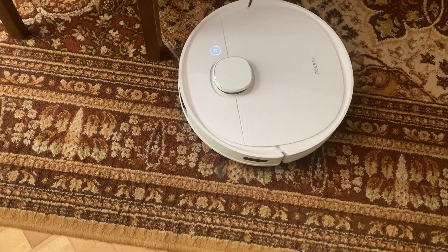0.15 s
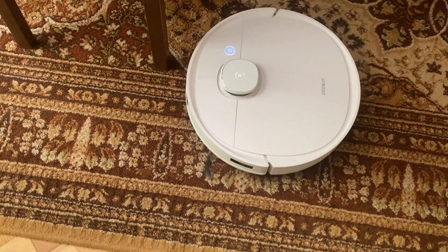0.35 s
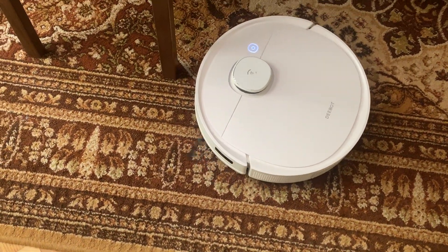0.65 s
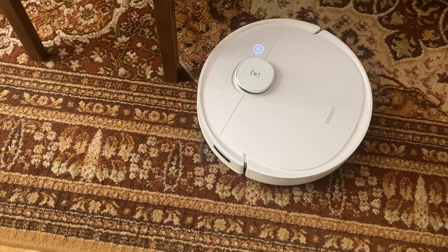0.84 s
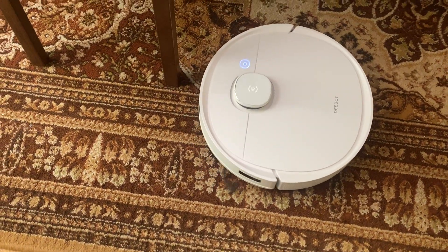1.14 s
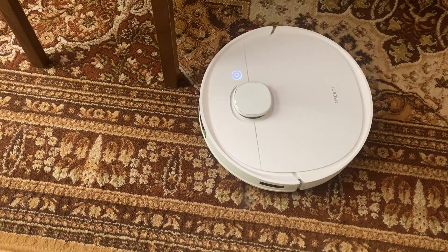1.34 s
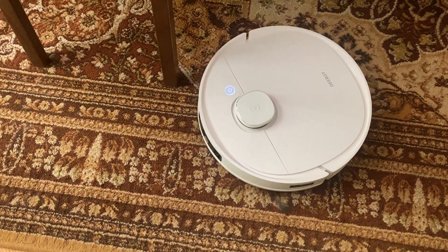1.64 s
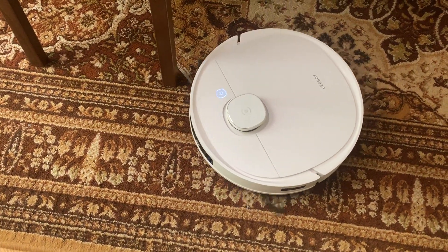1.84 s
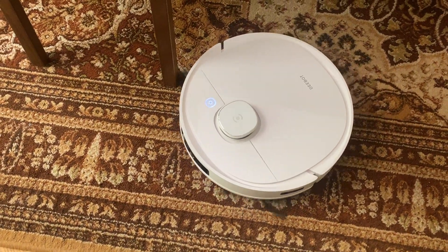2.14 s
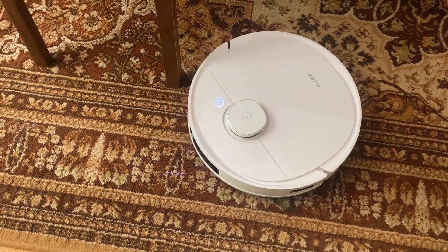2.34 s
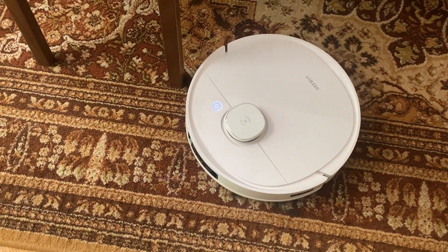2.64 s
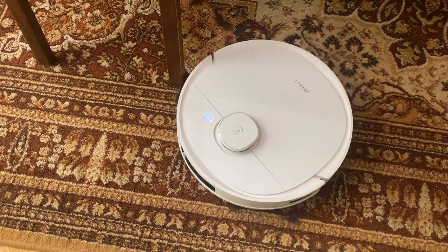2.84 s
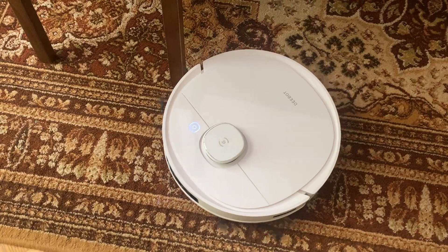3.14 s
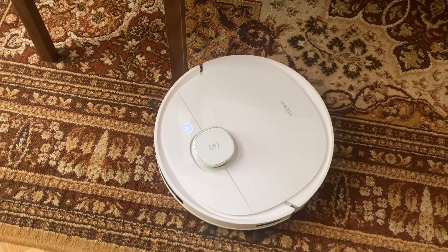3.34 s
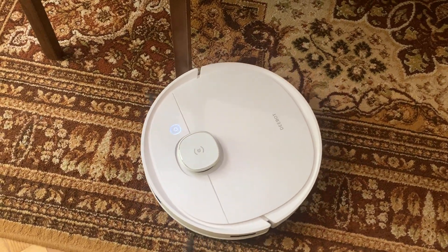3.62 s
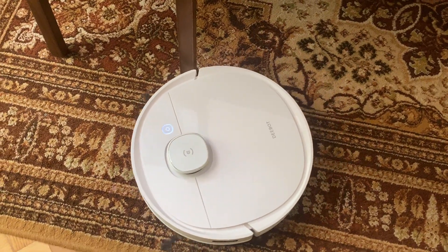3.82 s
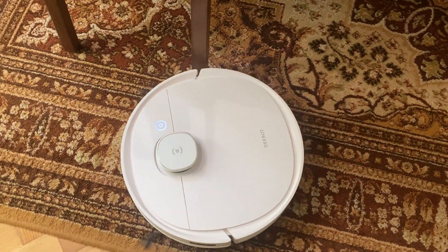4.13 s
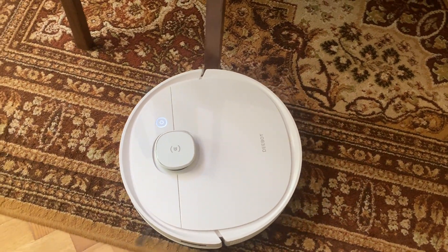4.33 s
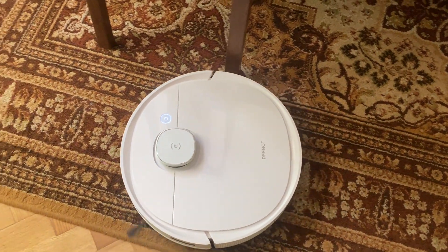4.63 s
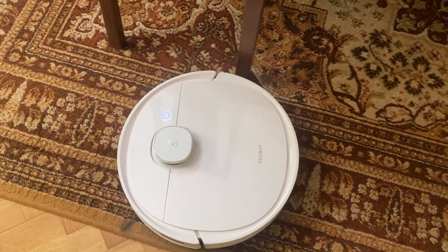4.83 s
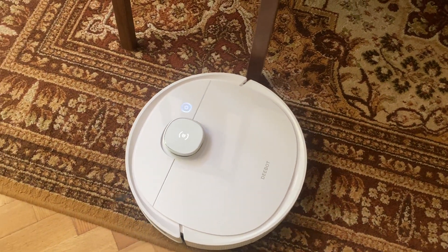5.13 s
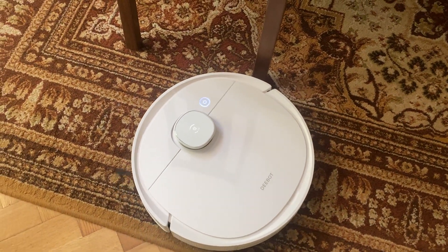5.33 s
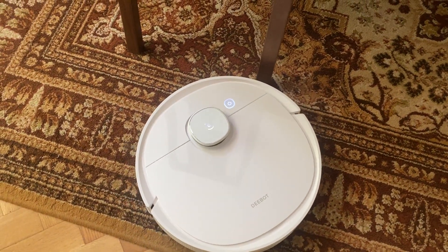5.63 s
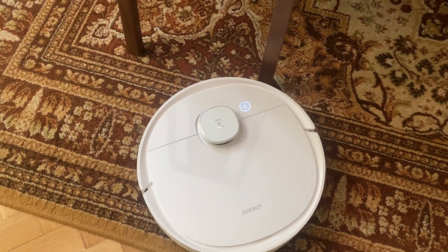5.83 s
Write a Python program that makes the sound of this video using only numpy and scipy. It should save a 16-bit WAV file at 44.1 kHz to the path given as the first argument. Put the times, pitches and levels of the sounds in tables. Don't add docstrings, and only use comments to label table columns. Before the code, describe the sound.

A robot vacuum hums and rushes steadily on a rug indoors, with a wavering high whine, soft thumps and brief squeaks.

```python
import sys
import numpy as np
from scipy import signal
from scipy.io import wavfile
from scipy.ndimage import uniform_filter1d

SR = 44100
rng = np.random.default_rng(int(sys.argv[2]) if len(sys.argv) > 2 else 0)


def digitize_waveform(pressure):
    field = np.atleast_2d(pressure).T
    bounded = np.clip(field, -1, 1)
    quanta = np.round(bounded * 32767).astype(np.int16)
    wavfile.write(sys.argv[1], SR, quanta)


def voltage_ratio(level):
    return 10 ** (np.asarray(level, float) / 20)


N = 263277
T = np.arange(N) / SR

# t/s, blade passing f/Hz, shaft hum level/dB, second order level/dB
FAN = [(0, 3288, -41, -40.5), (.3, 3257, -48, -40), (.66, 3258, -52, -42), (.95, 3250, -36.5, -41.5),
       (1.65, 3247, -38.5, -40.5), (1.85, 3240, -41, -42.5), (2.3, 3240, -38.5, -47),
       (2.4, 3241, -40.5, -43), (2.65, 3237, -36.5, -48), (2.95, 3242, -38, -45),
       (3.35, 3252, -37.5, -37.5), (3.95, 3260, -39.5, -42), (4.55, 3252, -34.5, -44),
       (4.8, 3232, -31, -44.5), (5.2, 3237, -36.5, -45), (5.55, 3248, -37.5, -47), (5.72, 3236, -34, -48),
       (5.97, 3265, -31, -45)]
# multiple of shaft speed, level/dB
FAN_UPPER = [(3, -61), (4, -65), (8, -68), (10, -68), (24, -68), (36, -80)]
# t/s, half length/s,
# level/dB
HUM_FALTERS = [(2.37, 0.029, -11), (2.8, 0.037, -1), (3.3, 0.011, -7), (4.575, 0.015, -10),
               (4.7, 0.033, -8), (1.22, 0.16, -4.5), (0.054, 0.035, -9), (.35, 0.029, -6), (.52, .05, -7),
               (3.4, 0.0369, -3), (4.2, .03, 0.5), (.78, 0.077, 5), (4.71, .04, 7), (4.2, .15, -3),
               (1.95, .12, 2), (2.68, .03, 4.5), (4.5, .02, -4), (4.7, 0.022, -5), (5.39, 0.019, -5),
               (2.7, .07, -5), (2.62, 0.03, -7), (2.19, .015, 4), (6.1, .02, -12), (5.63, .04, -9),
               (5.84, .04, -1.5)]
# middle t/s, half length/s, left level/dB, right level/dB, right lag/rad
WHINE_BEAMS = [(.72, .1, -65, -52, -2.5), (1.08, 0.12, -49, -51, -2.5), (1.695, 0.19, -45.5, -50, -1.5),
               (1.42, .15, -52, -53, -2.1), (2.14, 0.28, -45, -47.5, -1.5), (2.836, 0.29, -41.5, -48, -1.6),
               (3.07, 0.035, -60, -43, -1.5), (3.92, 0.13, -49.5, -58, -1.5), (4.12, 0.12, -55, -42, 3),
               (4.355, 0.096, -59, -53, 5), (4.55, 0.12, -44, -43, 5), (3.4, .2, -56, -57, -1.3),
               (4.68, .06, -51, -52, 5.5), (5.0, 0.12, -56, -49, 6.5), (5.3, 0.17, -54, -49.5, 3.5),
               (5.799, 0.27, -51, -48, 3)]
# multiple of roller speed, free level/dB, rise at full load/dB, rise under starting drag/dB
BRUSH_ORDERS = [(2, -70.5, 17, 2.5), (3, -53.5, 8, 3.5), (4, -49, 0.5, -1.7), (5, -57, 11, 10),
                (7, -61.5, 17, -4), (8, -56, 18, 4), (9, -60, 6, 3), (10, -54.5, 6.5, 3)]
# t/s, half length/s, level/dB
FOURTH_SWELLS = [(.27, 0.11, 7.5), (1.37, 0.19, 7), (2.343, 0.04, 10.5), (2.813, 0.037, 5), (3.447, .15, 5),
                 (5.9, 0.22, 4)]
# start t/s, grip time/s, let go t/s, sag/Hz, belt strain level/dB
BITES = [
    (.37, 0.17, 1.09, 1.18, -38.5),
    (.6, .13, 1.07, 1.99, -75),
    (2.24, .15, 2.54, 3.97, -47),
    (5.18, 0.282, 6.2, 2, -35),
    (5.55, 0.25, 6.2, 1.34, -48),
]
# t/s, half length/s, level/dB
BELT_SLIPS = [(0.68, 0.017, -10), (.9, .05, -9), (.53, 0.054, 1.5), (0.645, .03, 2.5), (.74, 0.033, 4),
              (0.813, .035, 2), (1.1, .05, -0.5), (5.347, .05, -3), (5.52, 0.039, 3), (5.9, .08, 0)]
# t/s, level/dB
GEAR = [(0, -50.5), (.5, -46.5), (1.1, -52), (1.25, -48), (1.7, -51), (1.9, -58), (2.3, -49.5), (3.3, -63),
        (3.9, -49), (4.6, -49.5), (4.9, -47), (5.3, -47), (5.45, -59), (5.97, -58)]
# f/Hz, level/dB per Hz
AIR_COLOUR = [(25, -62), (60, -25.5), (110, -12.5), (200, 0.5), (300, -1), (450, 3), (600, -1.5),
              (1100, -6), (1800, -10.5), (3150, -5.5), (3450, -15.5), (7000, -25), (12000, -31),
              (15300, -41.5)]
# f/Hz, width/Hz, level/dB
RESONANCES = [(169, 19, -7), (306, 49, -2.5), (366, 49, 4), (517, 52, 2.5), (651, 25, 4.5), (829, 144, 7),
              (981, 84, 3.5), (1188, 206, 4.5), (2424, 40, 6.5), (2790, 44, 6), (4270, 890, -0.5),
              (5630, 1940, 4.5), (7470, 340, 4.5),
              (12350, 900, 4), (14750, 900, 9), (15400, 300, -6)]
# f/Hz, left minus right level/dB, likeness/0-1, right lag/rad
PORTS = [(50.3, -3, 0.3, 1.2), (89, -3.5, 0.03, 0.84), (203, 9.5, 1, 1), (288, 14.5, 1, 0.21),
         (412, 8, 0.5, 1.52), (554, 3.5, 0.91, 2.98), (1090, 0.6, 0.99, 4.22), (2100, 2, 0, 3.88),
         (2560, 1, 0.78, 4.21), (3036, 3.5, 0.46, 2.9), (4220, -3.5, 0, 9.1), (4820, -1.5, 0.52, 2.8),
         (6300, 0, 0.36, 1.75), (7690, -1, 0.98, 2.79), (11100, -0.5, 0.98, 2.9)]
# t/s, length/s, f/Hz, width/Hz, level/dB
AIR_SWELLS = [(0.48, 0.32, 1280, 240, 6.5), (1.9, 1.2, 2100, 24.9, 8.5), (1.75, 0.14, 2400, 100, -3),
              (2.8, 0.25, 1300, 30.2, -6), (5.52, 0.35, 2900, 30, 15), (4.74, 1.2, 4190, 130, 7),
              (5.55, 0.17, 5420, 220, 11), (2.03, 1.1, 6000, 120, 8.5), (5.3, 1.49, 1280, 53, 4),
              (2, 1.5, 1680, 870, -2), (4.59, 0.15, 620, 36, 11), (5.7, 1.2, 3190, 570, -5.5),
              (1, 0.35, 11900, 500, 8), (5.15, 0.57, 16000, 300, 3), (5.2, 0.017, 380, 79, 9),
              (4.6, 0.9, 11800, 400, 5), (4.827, 0.31, 593, 69, -19), (3.4, 0.63, 120, 71.6, 3.5),
              (5.5, 0.24, 496, 46, 7), (0.8, 0.22, 440, 170, -7), (5.6, 0.21, 1200, 180, -3.5),
              (5.3, .9, 15200, 510, 4), (3.7, 1.1, 140, 55, 1), (4.4, 0.79, 360, 66, -2),
              (2.04, .3, 453, 120, -6), (1.43, 0.29, 815, 37, 9), (1.1, 0.12, 580, 110, -3),
              (4.23, 0.12, 1220, 120, -6), (2.28, .05, 74, 54, -11), (3.76, 0.22, 2400, 280, -5),
              (2.47, .1, 360, 168, 3), (3.3, 0.28, 2410, 30, 6.5), (2.43, 0.2, 4700, 1100, -4),
              (5.55, 0.14, 860, 60.4, 8.5), (1.893, 0.2, 1240, 101.5, -3), (2.1, 0.24, 2200, 28, 5),
              (5.4, .3, 1200, 36, 6), (0.29, 0.45, 3260, 260, -4), (3.6, 0.28, 910, 25, -2),
              (5.8, 0.37, 4540, 270, -2.5), (5.88, .1, 560, 120, 4.5), (6, .2, 140, 20, 6),
         (2.46, .08, 460, 40, 6), (2.48, .1, 300, 30, 5), (1, .1, 520, 120, -4), (2.85, .06, 490, 60, -7),
         (5.14, .04, 410, 27, 8)]
# t/s, turn/0-1
TURN = [(0, 0.44), (.9, 0.81), (1.5, 0.42), (2.4, 0.05), (3.1, 0.23), (3.6, 0.57), (4.2, 0.93), (5.0, 0.86),
        (5.97, 0.56)]
# t/s, thud level/dB, ring level/dB
THUMPS = [(.083, -35.5, -38), (.27, -32, -37), (1.405, -49, -30), (1.61, -42, -46), (1.926, -44, -57),
          (2.012, -40, -37), (2.415, -36, -27), (2.74, -46, -51), (2.93, -42, -44), (2.992, -36, -29),
          (3.092, -36.5, -46), (3.22, -35.5, -41), (3.326, -39, -42), (3.44, -43, -41), (3.53, -31, -43),
          (3.63, -44, -36), (3.732, -41, -31), (3.812, -39, -42), (3.992, -39, -31), (4.059, -41, -30),
          (4.174, -36, -29), (4.27, -40, -45), (4.359, -39, -33), (4.457, -40, -29), (4.544, -35.5, -29),
          (4.652, -37, -24), (4.762, -41, -40), (4.845, -40, -44), (4.915, -46, -37), (5.32, -37, -34)]
# f/Hz, level/dB, share/thud 0 to ring 1, right port level/dB, right lag/rad
THUMP_MODES = [(106.5, -7, 0, -3, 1), (139.8, 3, 0.06, -5.5, 0.95), (200, -4, 0.6, -6, .9),
               (377.4, 6, 1, -11, 1.5), (460, -10, 0.89, -8, 2.6)]
# middle t/s, half length/s, f/Hz, level/dB
TURRET_TONES = [
    (2.1, .3, 2458, -56),
    (2.9, .6, 2452, -54),
    (3.05, .3, 2352, -55),
    (3.8, .3, 2170, -57),
]
# t/s, level/dB, f/Hz, length/s
BUMPS = [
    (3.8, -46, 190, 0.011),
    (5.5, -42, 299, 0.00733),
    (3.1, -44, 140, 0.0064),
    (4, -42, 142, 0.037),
]
# t/s, length/s, from f/Hz, to f/Hz, level/dB
SQUEAKS = [
    (3.645, .045, 2940, 2790, -47.5),
    (3.73, .025, 2950, 3020, -51),
    (3.765, .04, 2880, 2660, -47),
    (4.15, .035, 2650, 2520, -53),
]

BLADES, GEAR_TEETH = 12, 26
BELT_ORDER = 8.74


def evened(x):
    return x / np.sqrt(np.mean(x ** 2) + 1e-20)


def columns(rows, at, scale=lambda v: v):
    first, *rest = np.transpose(rows)
    return np.array([np.interp(scale(at), scale(first), column) for column in rest])


def smooth(rows, t):
    return np.array([np.interp(T, t, row) for row in rows])


def ramp(t, start, length):
    return np.sin(np.pi / 2 * np.clip((t - start) / length, 0, 1)) ** 2


def passing_db(events, power=2):
    return sum(db * np.exp(-((T - s) / half) ** power) for s, half, db in events)


def resonance(hz, centre, width):
    return 1 / (1 + (2 * (hz - centre) / width) ** 2)


def wander(top_hz):
    coarse = T[::256]
    hz = np.geomspace(top_hz / 20, top_hz, 24)[:, None]
    waves = np.sin(2 * np.pi * (hz * coarse + rng.random(hz.shape)))
    return np.interp(T, coarse, evened(waves.sum(0)))


def tone(hz, level_db, flutter_db, blur, lag=None):
    tilt_db, _, port_lag = columns(PORTS, np.mean(hz) + 1, np.log)
    if lag is None:
        lag = port_lag
    angle = 2 * np.pi * (np.cumsum(hz) / SR + rng.random()) + blur * wander(18)
    size = np.sqrt(2) * voltage_ratio(level_db + flutter_db * wander(14))
    return size * np.array([np.sin(angle), voltage_ratio(-tilt_db) * np.sin(angle - lag)])


def roller(t):
    free_hz, cold_sag_hz, full_sag_hz = 48.4, 1.4, 4.3
    warm_s, spin_up_s, release_s, belt_grip_s = 1.13, 1.7, .12, 0.058
    sag_hz, strain = 0, voltage_ratio(-66)
    for s, grip, end, sag, db in BITES:
        sag_hz = sag_hz + sag * ramp(t, s, grip) * (1 - ramp(t, end, release_s))
        pull = ramp(t, s + 0.58 * grip, belt_grip_s) * (1 - ramp(t, end + 0.022, belt_grip_s))
        strain = strain + voltage_ratio(db) * pull
    hz = free_hz - np.hypot(cold_sag_hz * np.exp(-(t / spin_up_s) ** 2), sag_hz)
    load = np.minimum(sag_hz / full_sag_hz, 1) ** 0.78
    return hz, load, strain, np.exp(-(t / warm_s) ** 2)


def fan():
    blade_hz, hum_db, second_db = columns(FAN, T)
    hz, t = blade_hz / BLADES, T[::128]
    hum_db = hum_db + passing_db(HUM_FALTERS, power=4)
    at, half, left_db, right_db, lags = np.transpose(WHINE_BEAMS)[:, :, None]
    beam = np.exp(-((t - at) / half) ** 2)
    lag = (.1 * -0.32 + (lags * beam).sum(0)) / (.1 + beam.sum(0))
    left, right = (voltage_ratio(left_db) * beam).sum(0), (voltage_ratio(right_db) * beam).sum(0)
    lag, *whine = smooth([lag, left, right], t)
    stray = voltage_ratio([[-63.5], [-52]])
    out = tone(hz, hum_db, flutter_db=1.1, blur=.3, lag=.9) * voltage_ratio([[0], [-3]])
    out += tone(2 * hz, second_db, flutter_db=1.5, blur=0.18)
    out += tone(blade_hz, 0, flutter_db=1.5, blur=.3, lag=lag) * (stray + whine)
    facing = np.exp(-((T - 2.75) / .75) ** 4)
    out += tone(9 * hz, -61, flutter_db=2.5, blur=1.1) * facing
    return out + sum(tone(k * hz, db, flutter_db=2.5, blur=.8) for k, db in FAN_UPPER)


def brush():
    hz, load, strain, cold = smooth(roller(T[::128]), T[::128])
    swell_db = passing_db(FOURTH_SWELLS)
    jolts = sum(np.exp(-((T - s - .015) / .028) ** 2) for s, _, _ in THUMPS)
    jolt_db = 7 * (jolts - .5) * ramp(T, 2.75, 0.22) * (1 - ramp(T, 4.82, 0.17))
    out = np.zeros((2, N))
    for k, db, rise_db, cold_db in BRUSH_ORDERS:
        level_db = db + rise_db * load + cold_db * cold
        if k == 4:
            level_db = level_db + swell_db
        if k in (3, 4):
            level_db = level_db + jolt_db
        out += tone(k * hz, level_db, flutter_db=1 + 0.11 * k, blur=0.048 * k)
    throb = 1 + 0.55 * np.cos(2 * np.pi * 13.57 * (T - 5.443))
    belt = tone(BELT_ORDER * hz, 0, flutter_db=1.0, blur=0.43) * voltage_ratio([[0], [-6]])
    out += belt * strain * voltage_ratio(passing_db(BELT_SLIPS)) * throb
    return out + tone(GEAR_TEETH * hz, columns(GEAR, T)[0], flutter_db=2.5, blur=.7)


def mesh():
    hz, load = smooth(roller(T[::128])[:2], T[::128])
    out = tone(2 * GEAR_TEETH * hz, -62 + 5 * load, flutter_db=2.5, blur=1.2)
    return out + tone(6 * hz, -68 + 16.5 * load, flutter_db=1.5, blur=0.18)


def air():
    frames, hz = N // 512 + 5, np.fft.rfftfreq(2048, 1 / SR)
    s = (np.arange(frames) - 1) * 512 / SR
    a, b, c, d, patches, streaks = rng.standard_normal((frames, 1025, 6)).T
    patches = evened(uniform_filter1d(uniform_filter1d(patches, size=16, axis=0), size=25, axis=1))
    streaks = evened(uniform_filter1d(uniform_filter1d(streaks, size=3, axis=0), size=50, axis=1))

    colour_db = columns(AIR_COLOUR, hz + 1, np.log)[0]
    colour_db = colour_db + sum(db * resonance(hz, f, w) for f, w, db in RESONANCES)
    swells_db = sum(db * np.outer(resonance(hz, f, w), np.exp(-((s - at) / length) ** 2))
                    for at, length, f, w, db in AIR_SWELLS)
    roller_hz, load = smooth(roller(s)[:2], s)
    rumble_db = 2 - 1.5 * np.interp(s, T, load)
    hiss_db = -2 + 4.5 * columns(TURN, s)[0]
    low, high = 1 / (1 + (hz / 480) ** 4), 1 / (1 + (3600 / (hz + 1)) ** 4)
    field_db = colour_db[:, None] + np.outer(low, rumble_db) + np.outer(high, hiss_db) + swells_db
    calm = 1 - .5 / (1 + (10000 / (hz + 1)) ** 8)[:, None]
    field_db += calm * (1.4 * patches + 2.2 * streaks * (1 - .25 * high - .4 * low)[:, None])

    tilt_db, same, lag = columns(PORTS, hz + 1, np.log)[:, :, None]
    above_hz = np.maximum(hz - 11400, 0)[:, None]
    lag = lag + above_hz / 1800
    same = np.clip(same - np.minimum(above_hz / 3000, .5), 0, 1)
    left, other = a + 1j * b, c + 1j * d
    right = (same * np.exp(-1j * lag) * left + np.sqrt(1 - same ** 2) * other) * voltage_ratio(-tilt_db)
    spectra = np.array([left, right]) * voltage_ratio(field_db - 38 - 15.5)
    rush = signal.istft(spectra, nperseg=2048, noverlap=1536)[1][:, :N]

    rumble = signal.sosfilt(signal.butter(2, 500, fs=SR, output="sos"), rush)
    beat_db = 4.5 * (0.41 + 0.5 * load) * np.cos(2 * np.pi * np.cumsum(roller_hz) / SR)
    return rush + rumble * (voltage_ratio(beat_db) - 1)


def thumps():
    out, t = np.zeros((2, N)), np.arange(0, .12, 1 / SR)
    rise_s, fall_s = 0.01, 0.016
    shape = (1 - np.exp(-t / rise_s)) * np.exp(-t / fall_s)
    for s, thud_db, ring_db in THUMPS:
        here = out[:, round(s * SR):][:, :len(t)]
        for hz, db, share, right_db, lag in THUMP_MODES:
            angle = 2 * np.pi * hz * t
            pair = np.array([np.sin(angle), voltage_ratio(right_db) * np.sin(angle - lag)])
            here += voltage_ratio(db + thud_db + share * (ring_db - thud_db)) * shape * pair
    return out


def turret():
    return sum(tone(hz + 0 * T, db, flutter_db=2.5, blur=.6, lag=1.2) * np.exp(-((T - s) / half) ** 4)
               for s, half, hz, db in TURRET_TONES)


def bumps():
    knock = sum(voltage_ratio(db) * np.exp(-((T - s) / length) ** 2) * np.sin(2 * np.pi * hz * (T - s))
                for s, db, hz, length in BUMPS)
    return knock * voltage_ratio([[-12], [0]])


def squeaks():
    out = np.zeros(N)
    for s, length, from_hz, to_hz, db in SQUEAKS:
        u = np.arange(0, 1, 1 / (length * SR))
        hz = from_hz + (to_hz - from_hz) * u ** 2
        chirp = np.sin(2 * np.pi * np.cumsum(hz) / SR)
        out[round(s * SR):][:len(u)] += np.sqrt(2) * voltage_ratio(db) * np.sin(np.pi * u) * chirp
    return np.array([out, out])


def scene():
    return fan() + brush() + mesh() + air() + thumps() + turret() + bumps() + squeaks()


def top_cut(x):
    return signal.sosfilt(signal.butter(12, 15800, fs=SR, output="sos"), x)


def record(dry):
    return top_cut(dry)


dry = scene()
out = record(dry)
digitize_waveform(out)
```